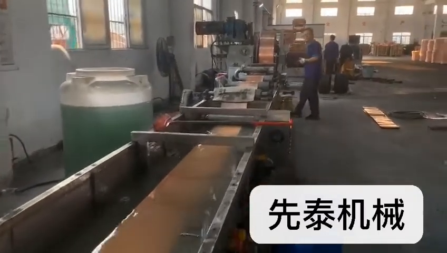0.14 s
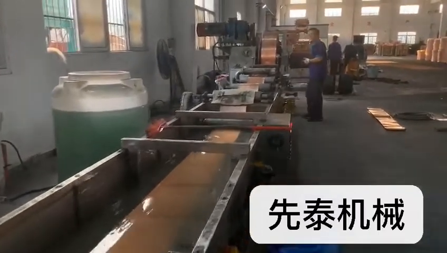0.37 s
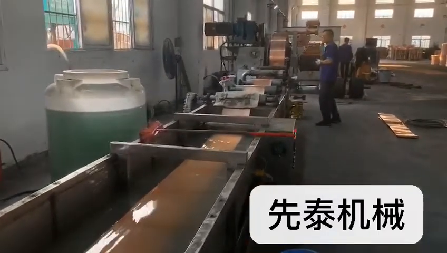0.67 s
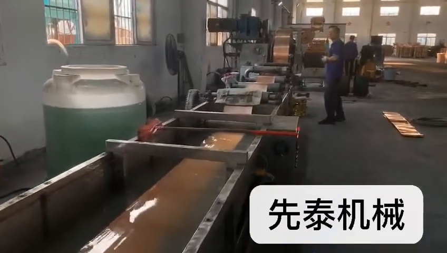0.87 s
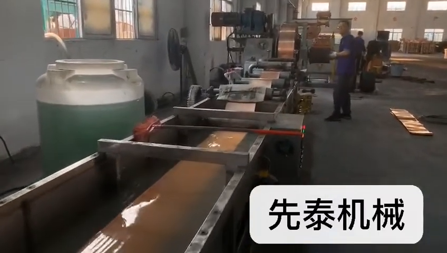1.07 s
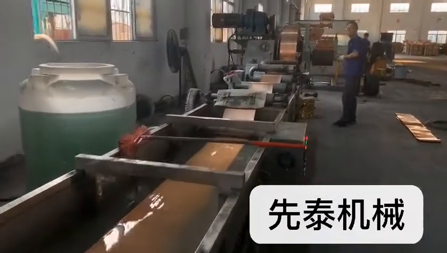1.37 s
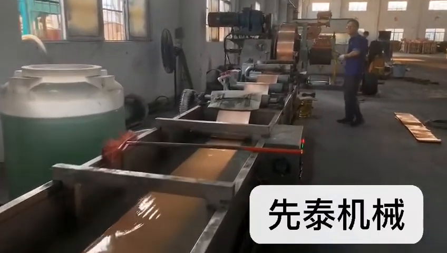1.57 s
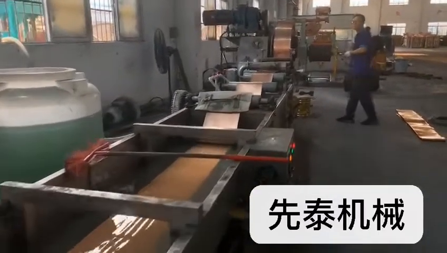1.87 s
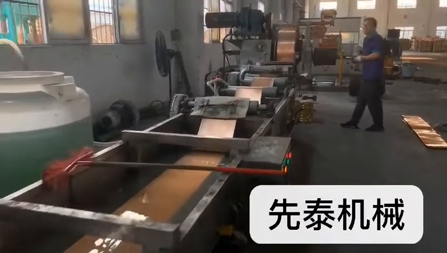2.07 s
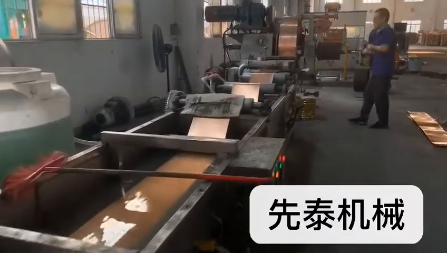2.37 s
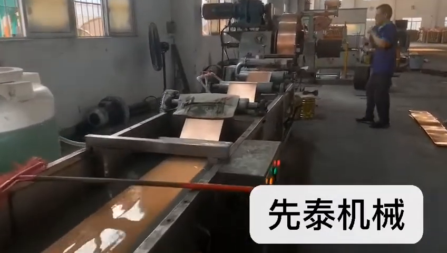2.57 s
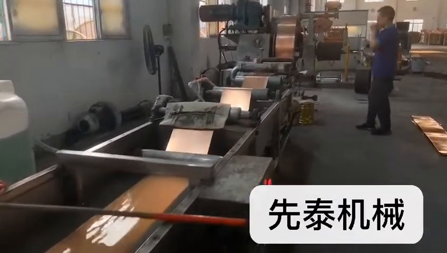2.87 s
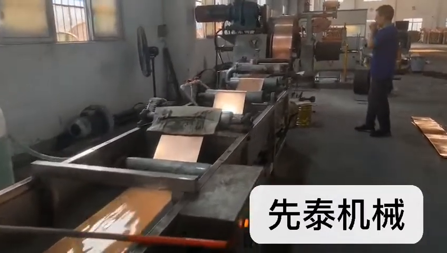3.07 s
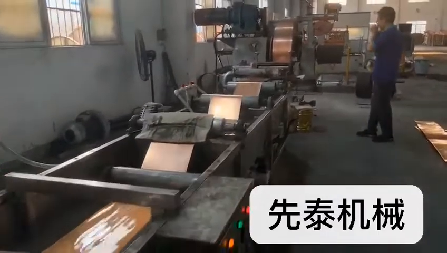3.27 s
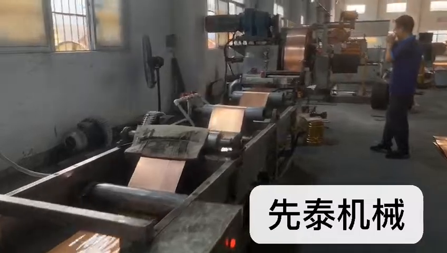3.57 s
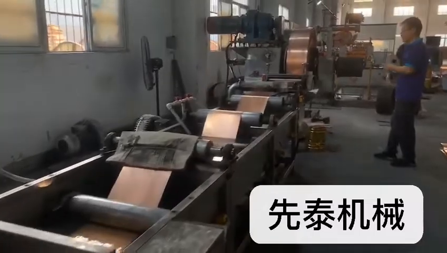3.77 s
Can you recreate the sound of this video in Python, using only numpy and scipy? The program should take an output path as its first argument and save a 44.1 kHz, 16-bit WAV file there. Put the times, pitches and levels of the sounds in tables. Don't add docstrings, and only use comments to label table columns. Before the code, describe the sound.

A low-heavy machinery drone runs unbroken from 0 to about 4 seconds in a big, hard-walled factory hall. Deep motor hum and wavering pump tones sit inside a wide, dull roar, with a steady gear hum above. A thin high whine comes and goes, slightly clearer near 1.4, 1.9 and 2.9 seconds. Tones swell and fade as the phone moves; its faint hiss slowly weakens.

```python
import sys
import numpy as np
from scipy import signal
from scipy.fft import rfft, irfft
from scipy.io import wavfile
from scipy.ndimage import uniform_filter1d

SR = 44100
rng = np.random.default_rng(int(sys.argv[2]) if len(sys.argv) > 2 else 0)


def voltage_ratio(decibels):
    exponent = np.asarray(decibels, float) / 20
    return 10 ** exponent


def dump(signal):
    limited = np.clip(np.atleast_2d(signal).T, -1, 1)
    pcm = np.round(limited * 32767).astype(np.int16)
    wavfile.write(sys.argv[1], SR, pcm)


N = 173754
T = np.arange(N) / SR
FREQ = np.maximum(np.arange(N // 2 + 1) * SR / N, 1)

# [f/Hz, density/dB]
ROAR_SPECTRUM = [(22, -13), (45, -11.5), (150, 0), (400, -5.5), (475, -9.5), (590, -12), (830, -11),
                 (2200, -22.5)]
# [t/s, level/dB]
WHINE_LEVELS = [(0.0, -49), (0.28, -39), (0.3, -45.5), (0.98, -44), (1.27, -49), (1.36, -34.5), (1.6, -48),
                (1.67, -38), (1.77, -48.5), (1.93, -36), (2.0, -41), (2.2, -37.5), (2.81, -50.5),
                (2.93, -33), (3.01, -44), (3.8, -45.5), (3.87, -39), (3.94, -41)]
PUMP_PITCHES = [47.0, 56.8, 113.5, 241.5, 300.2, 347.0, 534.0]
# [level/dB, depth/dB, period/s, loudest t/s]
PUMP_SWELLS = [(-41.5, 2, 3.0, 2), (-36, 2, 4.0, 0.87), (-42, 2, 1, 1.0), (-31, 4, 3.7, 1.33),
               (-35.5, 2, 3.9, 0.69), (-34, 3, 2.0, 1.4), (-43.5, 0, 4.5, 0.86)]
# [shaft turns from mesh tone/1, level/dB, depth/dB, period/s, loudest t/s]
GEAR_TONES = [
    (-2, -35, 2.5, 1.8, 1.2),
    (-1, -39, 4.5, 1.5, 0.42),
    (0, -28.5, 1, 2.3, 0.61),
    (1, -31.5, 5.5, 2.93, 0.61),
]
# [f/Hz, level/dB, depth/dB, period/s, loudest t/s]
MOTOR_TONES = [
    (72.25, -29.5, 3, 5.5, 0.78),
    (145.5, -30.5, 8, 5.8, 3.22),
    (219, -37, 0, 4.1, 2.7),
]
# [f/Hz, gain/dB]
MIC_RESPONSE = [(2350, 0.5), (3250, 4.5), (3800, -2), (4300, -12), (5600, -20.5), (7100, -27), (9100, -36),
                (10400, -44)]
# [f/Hz, share silenced/1]
SILENCED_SHARE = [(4050, 0), (4450, .33), (4800, .05), (6300, .2), (8500, .45), (10000, .62), (11500, .4),
                  (12600, .42), (13400, .05)]

MESH_HZ, SHAFT_HZ = 433.4, 9.12
TOP_HZ = 14060


def curve(table, at, scale=np.log):
    x, db = np.array(table, float).T
    return np.interp(scale(at), scale(x), db)


def level(x, db):
    return x * voltage_ratio(db) / np.sqrt(np.mean(x ** 2))


def walk(rate):
    hold = int(SR / rate)
    drift = np.repeat(rng.standard_normal(N // hold + 1), hold)
    drift = uniform_filter1d(uniform_filter1d(drift, hold), hold)[:N]
    return 1.312 * (drift - drift.mean())


def tone(hz, db, wander_hz, flutter_db):
    turns = np.cumsum(hz + wander_hz * walk(3)) / SR + rng.random()
    strength = np.sqrt(2) * voltage_ratio(db + flutter_db * walk(7))
    return strength * np.sin(2 * np.pi * turns)


def swell(db, depth_db, period, peak):
    return db + depth_db * np.cos(2 * np.pi * (T - peak) / period)


def hiss():
    below_hz = np.clip(13850 - FREQ, 0, 1900)
    slope = voltage_ratio(-15.5 * below_hz / 1000) * (FREQ > 9500)
    shape = slope * (FREQ < TOP_HZ)
    noise = level(irfft(rfft(rng.standard_normal(N)) * shape, N), -62)
    fade_db = -1.7 * (T - 2)
    return noise * voltage_ratio(fade_db + .6 * walk(8) + 2.2 * walk(90))


def roar():
    spectrum = rfft(rng.standard_normal(N)) * voltage_ratio(curve(ROAR_SPECTRUM, FREQ))
    place = 2 * np.log2(FREQ / 20)
    common = walk(1.7)
    out = 0
    for band in range(20):
        share = np.clip(1 - abs(place - band), 0, 1)
        flicker_db = .4 * common + .5 * walk(3.6) + .6 * walk(12)
        out = out + voltage_ratio(flicker_db) * irfft(spectrum * share, N)
    return level(out, -18)


def whine():
    pitch_hz, beat_hz, partner_db = 2824.0, 2.5, -14.5
    db = curve(WHINE_LEVELS, T, np.asarray)
    main = tone(pitch_hz, db, .6, 1.2)
    partner = tone(pitch_hz + beat_hz, db + partner_db, .6, 1.2)
    return main + partner


def pumps():
    return sum(tone(hz, swell(*row), 0.48, 2.7) for hz, row in zip(PUMP_PITCHES, PUMP_SWELLS))


def gearbox():
    mesh = sum(tone(MESH_HZ + round(turns) * SHAFT_HZ, swell(*row), 0.37, 2.2)
               for turns, *row in GEAR_TONES)
    overtone_hz, width_hz = 2 * MESH_HZ + SHAFT_HZ, 11.0
    blur = np.exp(-.5 * ((FREQ - overtone_hz) / width_hz) ** 2)
    overtone = level(irfft(rfft(rng.standard_normal(N)) * blur, N), -35.5)
    return mesh + overtone * voltage_ratio(swell(0, 1.9, 1.7, 1.67))


def motors():
    return sum(tone(hz, swell(*row), 0.22, 0.97) for hz, *row in MOTOR_TONES)


def scene():
    return (roar() + whine() + pumps() + gearbox() + motors())[None]


def dropouts(x):
    hz, _, z = signal.stft(x, SR, nperseg=1024)
    luck = rng.standard_normal((len(hz) // 3 + 1, z.shape[-1]))
    luck = uniform_filter1d(luck, size=5, axis=1)
    rank = luck.ravel().argsort().argsort().reshape(luck.shape) / luck.size
    rank = np.repeat(rank, 3, axis=0)[:len(hz)]
    gone = rank < curve(SILENCED_SHARE, np.maximum(hz, 1))[:, None]
    return signal.istft(z * np.where(gone, voltage_ratio(-45), 1), SR, nperseg=1024)[1][..., :N]


def band_limit(x):
    return signal.sosfilt(signal.butter(12, 14170, fs=SR, output="sos"), x)


def record(dry):
    heard = irfft(rfft(dry) * voltage_ratio(curve(MIC_RESPONSE, FREQ)), N)
    gapped = dropouts(heard + hiss())
    mix = irfft(rfft(gapped) * (FREQ < TOP_HZ), N)
    return band_limit(mix)


dry = scene()
out = record(dry)
dump(out)
```